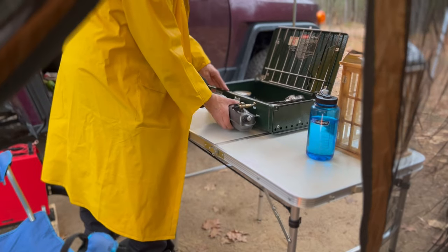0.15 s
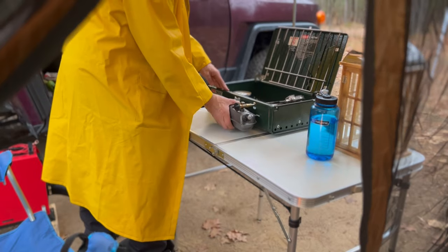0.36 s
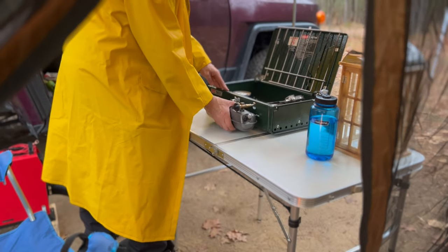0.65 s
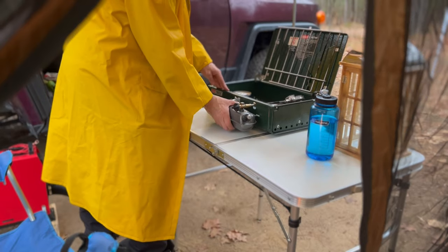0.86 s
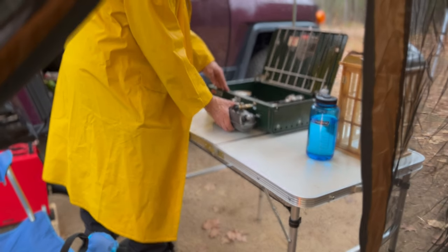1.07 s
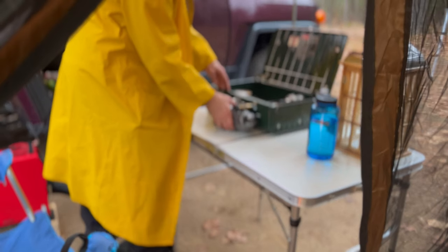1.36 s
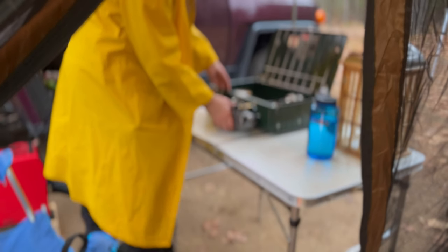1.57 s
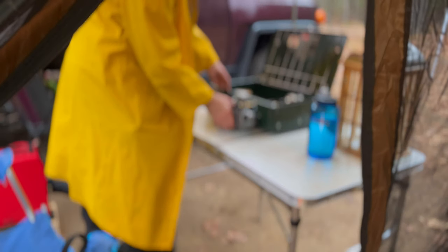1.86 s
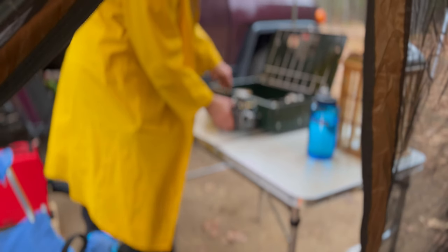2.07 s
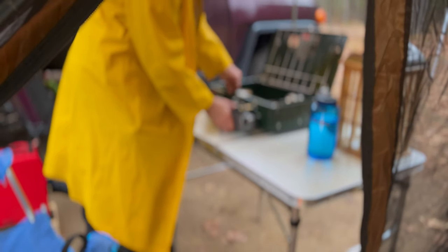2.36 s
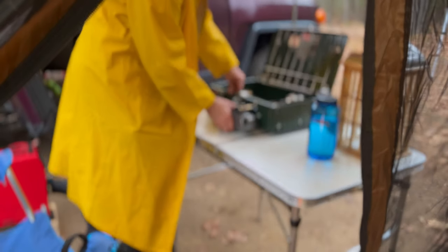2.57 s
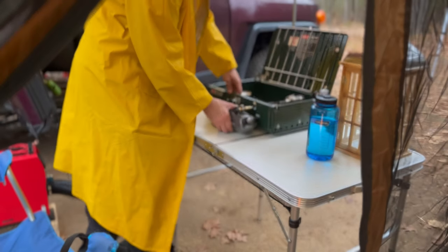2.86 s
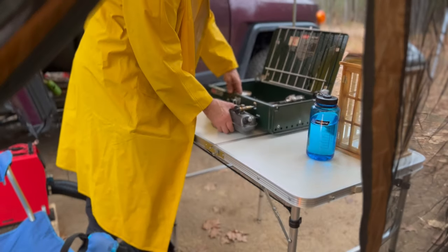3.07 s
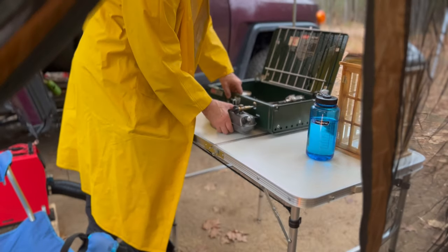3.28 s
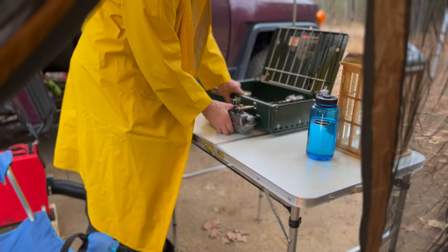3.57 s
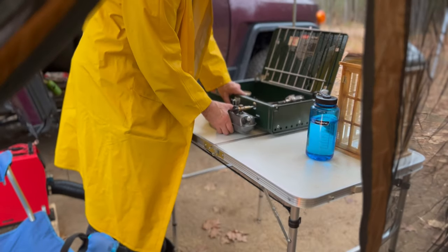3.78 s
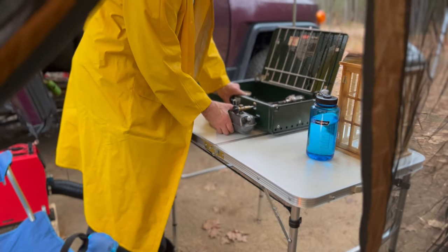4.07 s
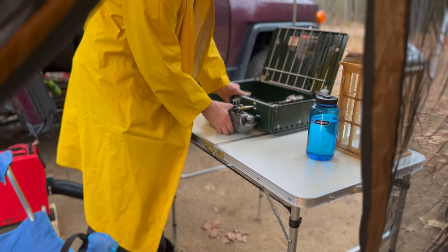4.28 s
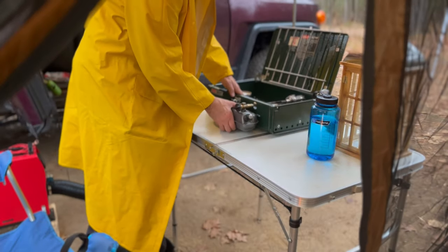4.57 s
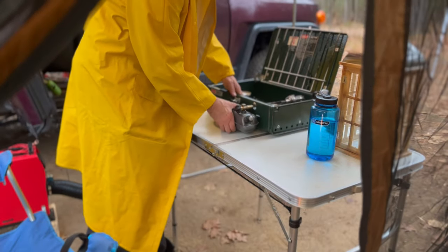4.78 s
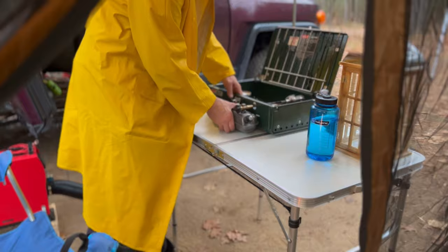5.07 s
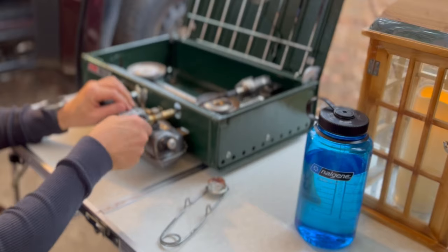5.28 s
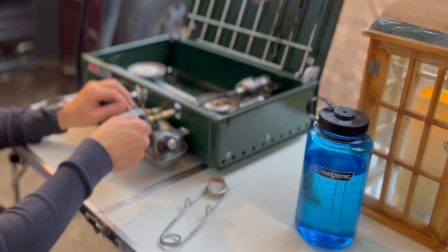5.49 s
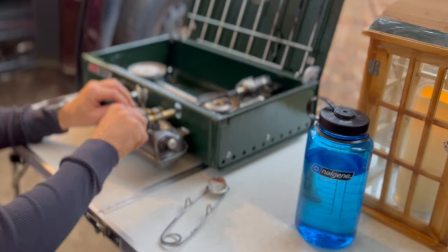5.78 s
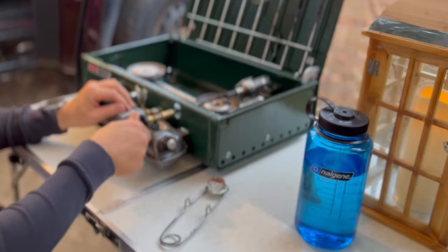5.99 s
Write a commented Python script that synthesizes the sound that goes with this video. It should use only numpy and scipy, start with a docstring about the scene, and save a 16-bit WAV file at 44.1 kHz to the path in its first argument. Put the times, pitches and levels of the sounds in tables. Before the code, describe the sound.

A sheet-metal camp stove is knocked and rattled on a folding table, then a small pump taps its hollow fuel tank in short series outdoors.

```python
"""Knocks and rattles of a sheet-metal camp stove on a folding table open the scene, amid faint fumbling.
Then a hand pump taps the hollow fuel tank in short series; the case is knocked and dragged in between.
Struck metal is sums of dying sines, rattle is sparse random contacts, shudder and hum are shaped noise.
Soft hiss and rumble of the open air and faint whistles lie behind, spread over two channels.
At 5.274 s all stove ringing stops at once; later stove sounds have less bass and the rumble is lower."""
import sys
import numpy as np
from scipy import signal
from scipy.fft import rfft, irfft, next_fast_len
from scipy.io import wavfile
from scipy.ndimage import uniform_filter1d

SR = 44100
rng = np.random.default_rng(int(sys.argv[2]) if len(sys.argv) > 2 else 0)


def unload_audio(sound):
    """Save the sound as a 16-bit wav file, at the path given as the first command line argument."""
    columns = np.transpose(np.atleast_2d(sound))
    # keep every value between -1 and 1, then stretch to whole-number steps
    steps = np.round(np.clip(columns, -1, 1) * 32767)
    wavfile.write(sys.argv[1], SR, steps.astype(np.int16))


N = 270333


def amp(db):
    """Decibels to gain."""
    return 10 ** (np.asarray(db) / 20)


def decay(t, t60_s):
    """Exponential fall by 60 dB in t60_s."""
    return amp(-60 * t / t60_s)


def evened(x):
    """Scales to rms 1."""
    return x / np.sqrt(np.mean(x ** 2) + 1e-20)


def loudest(x):
    """Scales so that the loudest five milliseconds have rms 1."""
    return x / np.sqrt(uniform_filter1d(x ** 2, size=220).max() + 1e-20)


def read(points, hz, axis=1):
    """Reads a spectrum table on a log-frequency axis."""
    table = np.array(points)
    return np.interp(np.log(hz + 1), np.log(table[:, 0] + 1), table[:, axis])


def coloured(x, points):
    """Shapes a signal by a (Hz, dB) table."""
    gain = amp(read(points, np.fft.rfftfreq(len(x), 1 / SR)))
    return irfft(rfft(x) * gain, len(x))


def add(mix, start_s, sound):
    """Mixes a sound in at start_s."""
    part = mix[round(start_s * SR):][:len(sound)]
    part += sound[:len(part)]


def ring(hz, db, t60_s, t, together=False):
    """Sums dying sines: random signs, or all starting together when struck at one spot."""
    sign = np.ones(len(hz)) if together else rng.choice([-1., 1.], len(hz))
    sines = np.sin(2 * np.pi * hz[:, None] * t)
    return (sign * amp(db)) @ (decay(t, t60_s[:, None]) * sines)


def grit(count, per_s, spread_db):
    """Sparse contacts at random moments, of random sign, a few of them large."""
    size = amp(spread_db * np.minimum(rng.exponential(1, count), 4))
    hit = rng.random(count) < per_s / SR
    return size * rng.standard_normal(count) * hit


# Pump strokes on the tank. Each row: start in seconds, blow level in dB, clatter re blow in dB,
# offsets in dB of the upper modes, lowest mode and bell mode, factor on the tank's t60.
TAPS = [(.843, -46.5, -5.5, -14, -13.5, -4, 1.04), (1.318, -45, -4.5, -12.5, -19.5, -13.5, 0.7),
        (1.526, -42, -7, -8, -19, -16.5, 0.71), (2.929, -48, -6, -21.5, -20, -20.5, 1.2),
        (3.145, -41.5, -6, -5, -17.5, -12, 0.92), (3.378, -44.5, -8, -6, -15.5, -14, 1.1),
        (3.5995, -44.5, -7, -17, -22, -14, 1), (3.796, -40.5, -7, -7, -16.5, -10, 0.73),
        (4.003, -38.5, -6, -8, -15, -11, 0.82), (5.285, -40.5, -8, -7.5, -31, 0.5, 1.07),
        (5.519, -53, -14, -10.5, -29, 0, 1.2), (5.766, -49, -2.5, -12.5, -26.5, -3, 1.42),
        (5.977, -43.5, -9, -7, -20, -3, 0.92)]
# Tank modes. Each row: frequency in Hz, level in dB, free t60 in seconds.
TANK = [(588.5, 11.5, 0.36), (802, -7.5, 0.36), (925, -6, 0.31), (960, -7.5, 0.21), (1038.5, 1.5, 0.34),
        (1058, -6, 0.28), (1084, 1, 0.21), (1482, 3, 0.145), (1435, -13, 0.114), (1560, 0.5, 0.16),
        (2176, -2, 0.173)]
BELL_HZ = 1570  # the mode near this takes its own offset
FIRST_BLOW, FIRST_BLOW_S = 1.2, 0.0045  # extra strength while the plunger presses, its time constant


def tap(blow_db, clatter_db, upper_db, lowest_db, bell_db, t60_factor):
    """The plunger strikes the tank: its hand-damped modes ring, with a short clatter on top."""
    t = np.arange(SR // 2) / SR
    hz, db, t60_s = np.transpose(TANK)
    is_bell = abs(hz / BELL_HZ - 1) < .04
    db = db + np.where(is_bell, bell_db, (hz > 1300) * upper_db)
    db = db + (hz < 700) * lowest_db + 0.81 * rng.standard_normal(len(hz))
    tone = ring(hz, db, t60_factor * t60_s, t, together=True) * (1 - np.exp(-t / 0.0032))
    tone = loudest(tone * (1 + FIRST_BLOW * np.exp(-t / FIRST_BLOW_S)))
    clatter = grit(len(t), per_s=6900, spread_db=2.5)
    clatter = clatter * decay(t, 0.22) * (1 - np.exp(-t / 0.0015))
    clatter_shape = [(300, -18), (650, -0.5), (1200, 0.5), (2500, -5.5), (6000, -13.0), (15000, -26.5)]
    clatter = loudest(coloured(clatter, clatter_shape))
    return amp(blow_db) * (tone + amp(clatter_db) * clatter)


# Knocks on the case. Each row: start in seconds, nominal thud, body, clank, tick and ring levels in dB,
# thud Hz, clank Hz, favoured mode Hz, nominal rattle t60 in seconds (both trimmed per band below).
KNOCKS = [(.016, -65, -49, -74.5, -74, -52, 153, 2900, 725, 0.38),
          (.108, -60, -42.5, -42.5, -55, -49, 202, 2725, 4700, 0.36),
          (.149, -68, -46, -50, -61.5, -48.5, 423, 2980, 2274, 0.32),
          (.233, -66, -45.5, -79.5, -78, -44, 278, 2900, 880, 0.55),
          (.244, -46, -72.5, -74, -72, -51, 164, 2600, 980, 0.11),
          (.667, -38, -34, -42, -47, -36, 302, 3460, 310, 0.287),
          (1.067, -51.5, -42, -43, -50, -48, 236, 2900, 2030, 0.27),
          (1.081, -49, -33.5, -40, -46, -38.5, 413, 1900, 528, 0.31),
          (1.092, -60, -37.5, -36, -42, -37.5, 315, 2800, 1940, 0.31),
          (1.117, -48.5, -43.5, -64, -49.5, -39, 423, 3200, 1460, 0.51),
          (1.717, -58, -46, -53, -54, -45, 374.5, 3170, 445, 0.27),
          (1.827, -54.5, -52.5, -53, -52, -56, 310.1, 2820, 880, 0.41),
          (2.015, -62, -71, -59, -59, -59, 297.4, 2800, 923, 0.345),
          (2.95, -51, -53, -48, -55, -53, 296.5, 2580, 1070, 0.096),
          (2.985, -53.5, -45.5, -56, -61, -51, 225.4, 2620, 1987, 0.49),
          (3.363, -41, -46, -63, -67, -49, 190.2, 2200, 500, 0.15),
          (3.437, -50, -48, -77, -73.5, -52, 126, 1900, 560, 0.27),
          (3.647, -56, -51.5, -55, -75, -58.5, 299, 1700, 1100, 0.14),
          (3.854, -59, -50, -65, -77, -51, 281, 3700, 1070, 0.206),
          (4.409, -74, -35.5, -37.5, -38.5, -41.5, 318, 2220, 757, 0.42),
          (4.42, -64.5, -32, -33, -59, -33, 315, 3170, 976, 0.47),
          (4.443, -61.5, -35, -35, -57, -40.5, 163, 2200, 740, 0.3),
          (4.469, -39, -39, -40, -45, -54, 228, 2350, 644, 0.31),
          (4.566, -54, -41, -45, -48, -38, 196, 2700, 548, 0.335),
          (4.584, -41.5, -33.5, -45, -49.5, -40, 268, 2000, 677, 0.137),
          (4.594, -58, -30.5, -36, -39.5, -43, 208, 2600, 2630, 0.23),
          (4.605, -49, -45, -37.5, -46.5, -35.5, 320, 2000, 477, 0.28),
          (4.696, -59, -43.5, -46, -50.5, -49, 120, 2970, 1075, 0.54),
          (4.731, -44, -50, -55.5, -61, -47.5, 122.4, 2380, 474, 0.18),
          (4.831, -63, -50.5, -59, -51.5, -66.5, 155.5, 3300, 1608, 0.14),
          (4.904, -47.5, -48, -58, -59.5, -69, 122.5, 2500, 1600, 0.16),
          (4.984, -47, -52, -64, -57.5, -69, 120, 3300, 1580, 0.11),
          (5.187, -52.5, -49.5, -66.5, -62, -57, 230, 2720, 832, 0.247),
          (5.611, -43.5, -54.5, -55, -62, -42.5, 299, 2440, 436.4, 0.25),
          (5.726, -55.5, -61, -57, -69, -66.5, 183.8, 2860, 413, 0.79),
          (5.854, -58, -50, -57, -57, -54.5, 378.7, 2690, 818, 0.18),
          (5.899, -50.5, -59, -71.5, -85, -67, 148, 2780, 387, 0.12)]
# Case and table modes, also used by scrape. Each row: frequency in Hz, level in dB,
# undamped t60 in seconds.
CASE = [(105.4, 6, 0.86), (188, 4, 0.55), (216.5, 12.5, 0.26), (315, 3, 0.94), (381, -8, 0.29),
        (444, -23.5, 0.16), (481, 7.5, 0.33), (542, 5.5, 0.37), (594.6, 3.5, 0.35), (611, 12.5, 0.21),
        (742.5, -3.5, 0.51), (880, 0, 0.11), (961, -2, 0.37), (1042, 9.5, 0.123), (1476, 3, 0.28),
        (1987, 5.5, 0.3), (2272, 4, 0.15), (2630, -24, 0.2), (3170, 5.5, 0.11), (3230, 13, 0.078),
        (3540, 3.5, 0.3), (4090, 11, 0.049), (4700, 12, 0.04), (6370, 10.5, 0.078)]
BODY_HZ, TICK_HZ = 804, 5400  # band centres
CLANK_SHARE = 0.67  # clank t60 re rattle t60


def knock(thud_db, body_db, clank_db, tick_db, ring_db, thud_hz, clank_hz, favoured_hz, rattle_t60_s):
    """A blow and its loose rattle shake the case; the spot struck favours one mode."""
    t = np.arange(SR // 2) / SR
    modes_hz, modes_db, modes_t60_s = np.transpose(CASE)
    contacts = grit(len(t), per_s=8000, spread_db=2.0)

    varied_db = modes_db + 0.98 * rng.standard_normal(len(CASE))
    panel = ring(modes_hz, varied_db, 0.23 * modes_t60_s, t[:8000])
    shaken = signal.fftconvolve(contacts, panel)[:len(t)]
    shaken = coloured(shaken, [(100, 0.52), (6400, 15.0)])
    spectrum = rfft(evened(contacts) + amp(-9.0) * evened(shaken))
    f = np.fft.rfftfreq(len(t), 1 / SR)

    clank_t60_s = CLANK_SHARE * rattle_t60_s
    # Each row: level in dB, centre in Hz, spread in log frequency, rise in s, t60 in s.
    bands = ((thud_db - 0.5, thud_hz, .4, .005, 1.16 * rattle_t60_s),
             (body_db, BODY_HZ, .62, .003, rattle_t60_s),
             (clank_db, clank_hz, .23, .0012, clank_t60_s),
             (tick_db, TICK_HZ, .4, .001, 1.7 * clank_t60_s),
             (tick_db - 4.5, 2 * TICK_HZ, .35, .0009, 0.8 * clank_t60_s))
    out = np.zeros(len(t))
    for db, centre_hz, spread, rise_s, t60_s in bands:
        share = np.exp(-.5 * (np.log((f + 1) / centre_hz) / spread) ** 2)
        fade = decay(t, np.clip(t60_s, .02, 1)) * (1 - np.exp(-t / rise_s))
        fade *= 1 + 1.16 * np.exp(-t / (1.13 * rise_s))  # the first contact is the hardest
        out += amp(db) * loudest(irfft(spectrum * share, len(t)) * fade)

    # the panel's first bow
    bow = np.sin(2 * np.pi * thud_hz * t) * decay(t, np.clip(rattle_t60_s, .02, 1))
    out += amp(thud_db + 1.5) * bow * (1 - np.exp(-t / 0.00104))

    near_db = -700 * np.log(modes_hz / favoured_hz) ** 2  # only modes close to the favoured one ring on
    struck = contacts * decay(t, 0.12)  # later contacts keep upsetting the ring
    struck[0] = 3 * np.abs(struck).max()
    ring_t60_s = np.minimum(0.43 * modes_t60_s, 0.89 * rattle_t60_s)
    tone = signal.fftconvolve(struck, ring(modes_hz, near_db, ring_t60_s, t))[:len(t)]
    return out + amp(ring_db) * loudest(tone)


# Hard single contacts on one spot of sheet metal or table top.
# Each row: start in seconds, peak in dB, frequency in Hz, t60 in seconds.
CLINKS = [(.109, -36.5, 3000, 0.0305), (.109, -48, 4913, 0.11), (.12, -40.5, 2040, .04),
          (.146, -44, 2240, .08), (.154, -41.5, 3010, 0.061), (.237, -41, 900, .1), (.662, -40, 2300, .03),
          (.6663, -28.5, 4350, 0.013), (.6663, -31, 3650, 0.016), (.669, -39, 1345, 0.054),
          (.717, -39, 784, 0.067), (1.082, -33.5, 531.4, 0.113), (1.082, -32, 1400, .08),
          (1.094, -26.5, 3150, 0.054), (1.0935, -35, 3600, 0.05), (1.098, -31, 1440, 0.0515),
          (1.101, -34, 1969, 0.05), (1.118, -29.5, 1470, 0.17), (1.118, -35, 3170, 0.087),
          (1.126, -44.5, 12000, 0.11), (1.718, -37.5, 448, 0.092), (1.74, -41.5, 1140, 0.062),
          (1.822, -41, 316, 0.075), (1.853, -42, 299, 0.19), (2.955, -37, 1086, 0.049),
          (2.957, -44, 280, 0.071), (2.986, -43, 297.5, 0.059), (3.012, -43.5, 599, 0.34),
          (3.003, -45, 171, 0.097), (3.017, -38.5, 169, 0.14), (3.367, -32.5, 190, 0.05),
          (3.437, -39, 1010, 0.045), (3.45, -45, 554, 0.06), (4.41, -33, 923, .15),
          (4.449, -34, 12260, .04), (4.587, -30, 637, 0.052), (4.595, -23, 4060, 0.018),
          (4.595, -35, 6320, .04), (4.595, -28, 2477, 0.087), (4.598, -26, 2590, 0.043),
          (4.594, -25.5, 1404, 0.06), (4.608, -29, 473, .045), (4.697, -39, 1320, 0.051),
          (4.731, -36.5, 333, 0.093), (4.744, -37, 129.6, 0.17), (5.158, -46, 99.8, 0.22),
          (5.187, -43, 800, 0.063), (5.194, -39, 222, 0.076), (5.212, -39, 302, 0.035),
          (5.248, -41, 201, 0.093)]


def clink(peak_db, hz, t60_s):
    """One mode struck hard and then nudged by chatter, so it rings rough and dies fast."""
    t = np.arange(SR // 4) / SR
    chatter = grit(900, per_s=900, spread_db=1.0) * np.exp(-t[:900] / 0.0064)
    chatter[0] = 3
    mode = decay(t, np.clip(t60_s, .01, 1)) * np.sin(2 * np.pi * hz * t)
    tone = signal.fftconvolve(chatter, mode)
    return amp(peak_db) * tone / np.abs(tone).max()


# Single dry ticks of small parts. Each row: start in seconds, level in dB, centre in Hz.
TICKS = [(2.186, -39.5, 1560), (3.3315, -37, 2120), (3.647, -35, 1200), (4.04, -30.5, 1124),
         (4.245, -42, 1106), (4.28, -38.5, 1515), (4.445, -22, 1900), (4.598, -23, 2600),
         (5.397, -31.5, 3570), (5.504, -43, 1900)]


def tick(db, hz):
    """A sine of a cycle or two, gone at once."""
    t = np.arange(300) / SR
    return amp(db) * np.sin(2 * np.pi * hz * t) * np.exp(-t * hz / 1.85)


# Wire grate bouncing on its rests. Each row: start in seconds, level in dB.
BOUNCES = [(1.417, -55), (1.4774, -52), (1.6457, -53), (1.8, -52.5), (4.75, -42.5), (4.8367, -46),
           (4.9137, -49), (4.985, -49.5)]
GRATE_HZ, GRATE_T60_S = 1572, 0.29


def bounce(db):
    """One grate mode rings for 43 ms, its ends smoothed."""
    t = np.arange(1900) / SR
    tone = decay(t, GRATE_T60_S) * np.sin(2 * np.pi * GRATE_HZ * t)
    return amp(db) * tone * signal.windows.tukey(len(t), .3)


# The case dragged over the table. Each row: start in seconds, length in seconds,
# peak push in dB, bright part re dull part in dB.
SCRAPES = [(1.72, 0.072, -45.5, -24), (1.805, 0.392, -53, -13), (2.245, 0.047, -58, -18),
           (2.945, 0.16, -46, -21.5), (4.408, 0.16, -35.5, -3), (4.66, 0.056, -43, -6.5),
           (4.72, 0.062, -43.5, -16), (4.79, 0.23, -53, -9), (5.215, 0.052, -50, -9)]
GRIP, SLACK_DB = 0.287, -11  # push peaks at this share of the drag; level at both ends re peak


def scrape(length_s, push_db, bright_db):
    """Quick slips of the feet shake the panels while the case slides."""
    t = np.arange(0, length_s, 1 / SR)
    hz, db, t60_s = np.transpose(CASE)
    slips = grit(len(t), per_s=6000, spread_db=3.0)
    panel = ring(hz, db, 0.13 * t60_s, np.arange(4000) / SR)
    shaken = evened(slips) + 0.27 * evened(signal.fftconvolve(slips, panel)[:len(t)])
    dull_shape = [(60, -56.5), (120, 6.0), (300, 8.0), (1500, 1.0), (3000, -8.0), (6000, -32)]
    bright_shape = [(1200, -37), (2600, -8.0), (5000, -11.0), (9000, -15), (15000, -22)]
    dull = evened(coloured(shaken, dull_shape))
    bright = evened(coloured(shaken, bright_shape))
    push = amp(push_db + np.interp(t / length_s, [0, GRIP, 1], [SLACK_DB, 0, SLACK_DB]))
    return push * (dull + amp(bright_db) * bright) * signal.windows.tukey(len(t), .1)


def swell(shape, db, rise_s, t60_s):
    """Noise through broad modes that builds up after a jolt and dies away."""
    t = np.arange(SR) / SR
    fade = loudest((1 - np.exp(-t / rise_s)) * decay(t, t60_s))
    return fade * amp(db) * evened(coloured(rng.standard_normal(SR), shape))


# Jolts of the table top. Each row: start in seconds, level in dB, t60 in seconds.
JOLTS = [(0, -50.5, 0.5), (.235, -51.5, 1.26), (.47, -61, 0.85), (.668, -45, 0.97), (1.083, -48, 1.6),
         (1.38, -54, 0.76), (1.625, -53.5, .3), (1.73, -51, 1.8), (2.76, -58.5, 0.74), (2.98, -47.5, 0.86),
         (3.36, -53, 0.56), (3.44, -47, 0.488), (3.638, -56.5, 1.1), (3.853, -65, 0.72), (4.44, -41, 1.16),
         (4.59, -43, 0.58), (4.725, -46, 0.56), (4.912, -54.5, 0.88), (5.155, -61, 0.56), (5.612, -49, 0.8)]
# Table-top resonance. Each row: frequency in Hz, relative level in dB per Hz.
TABLE_TOP = [(40, -3), (70, -3.5), (108, 9.5), (135, 1), (180, 5), (230, -1), (300, -2.5), (420, -42)]


def shudder(db, t60_s):
    """Low random shudder of the table top."""
    return swell(TABLE_TOP, db, rise_s=0.0056, t60_s=t60_s)


# Hollow parts humming as hands shake the case.
# Each row: start in seconds, level in dB, pitch as a ratio to HUM_SHAPE.
HUMS = [(.51, -54.5, 0.755), (5.612, -44, 0.99), (5.775, -53, 0.99), (5.9, -59.5, 0.98), (6.045, -57, 1.)]
# Hum resonance at pitch 1. Each row: frequency in Hz, relative level in dB per Hz.
HUM_SHAPE = [(300, -39), (375, -8), (393, -1), (415, 1.5), (520, -56)]


def hum(db, pitch):
    """Noise in one narrow resonance."""
    return swell(np.array(HUM_SHAPE) * [pitch, 1], db, rise_s=0.0034, t60_s=0.47)


FUMBLE_PER_S, FUMBLE_DB = 120, -52  # mean tick rate; tick level before random sizes


def fumbling():
    """Fingers on metal: tiny ticks at random moments, each at one of six pitches."""
    contacts = grit(N, FUMBLE_PER_S, spread_db=1.5)
    kind = rng.integers(0, 6, N)
    out = np.zeros(N)
    for k, hz in enumerate(np.geomspace(900, 3500, num=6)):
        out += signal.oaconvolve(contacts * (kind == k), tick(FUMBLE_DB, hz))[:N]
    return out


# Faint thin whistles, perhaps a bird. Each row: start in seconds, length in seconds, Hz, level in dB.
WHISTLES = [(.84, 0.138, 5480, -64), (2.378, 0.112, 5430, -63.5), (3.594, 0.162, 5400, -62.5)]


def whistle(length_s, hz, db):
    """A soft sine that wavers a little."""
    t = np.arange(round(length_s * SR)) / SR
    waver = 2.15 * np.sin(2 * np.pi * 23 * t)
    return amp(db) * np.sin(2 * np.pi * hz * t + waver) * signal.windows.tukey(len(t), .6)


# Rumble level over time. Each row: time in seconds, relative level in dB.
AIR = [(0.0, -58.5), (.5, -58), (2.3, -56.5), (2.9, -60.5), (3.6, -56), (3.98, -58), (4.2, -64.5),
       (4.4, -59.5), (4.8, -52), (5.1, -60), (5.265, -58), (5.28, -77), (5.6, -80.5), (5.66, -69.5),
       (6.13, -64.5)]
# Rumble spectrum. Each row: frequency in Hz, relative level in dB per Hz.
RUMBLE = [(25, -63), (50, 17.5), (100, -1), (200, -8.5), (400, -4), (750, -5), (1100, -31.5)]
# Hiss spectrum. Each row: frequency in Hz, relative level in dB per Hz.
HISS = [(200, -8), (500, -6), (1200, 3.5), (2000, 0), (3500, -4), (5000, -6), (6500, -12), (9000, -16.5),
        (12500, -17.5), (15500, -35)]
HISS_DB = -54  # steady, same relative scale as AIR


def air():
    """Open air: two unrelated noise draws sharing one patchy spectrum of rumble and hiss."""
    frames, hz = N // 256 + 5, np.fft.rfftfreq(1024, 1 / SR)
    t = np.arange(frames) * 256 / SR
    patches = rng.standard_normal((frames, 513)).T
    patches = uniform_filter1d(patches, size=10, axis=0)
    patches = evened(uniform_filter1d(patches, size=10, axis=1))
    rumble_db = np.interp(t, *np.transpose(AIR))
    power = 0
    for shape, level_db in ((RUMBLE, rumble_db), (HISS, HISS_DB + 0 * t)):
        gain = amp(read(shape, hz))
        power = power + np.outer(gain / np.linalg.norm(gain), amp(level_db)) ** 2
    real, imag = np.transpose(rng.standard_normal((frames, 513, 2, 2)))
    spectra = (real + 1j * imag) * np.sqrt(power) * amp(2.0 * patches + 1.0)
    return signal.istft(spectra, nperseg=1024, noverlap=768)[1][:, :N]


def scattered(x, t60_s):
    """Sparse reflections from nearby surfaces, energy 1, drawn anew for every sound."""
    at = np.arange(20, 6000, 20) + rng.integers(0, 20, 299)
    echoes = np.zeros(6100)
    echoes[at] = rng.choice([-1., 1.], len(at)) * decay(at / SR, t60_s)
    return signal.fftconvolve(x, echoes / np.linalg.norm(echoes))


# Phase between the channels. Each row: frequency in Hz, left lead in radians.
CHANNEL_PHASE = [(0, 0), (1380, -0.2), (2670, 0.7), (3620, 0.5), (4740, 0.5), (5600, -1.2), (6460, -1.0),
                 (7670, -2.9), (8870, -3.2), (11100, -6.2), (13000, -6.4), (13600, -6.8), (14000, -9.2),
                 (15200, -9.5)]
# Likeness of the left and right channels, by frequency.
# Each row: frequency in Hz, likeness for near sounds, likeness for the air.
LIKENESS = [(100, .995, .985), (300, .985, .92), (700, .88, .35), (1400, .8, .15), (2400, .9, .55),
            (3800, .8, .42), (5200, .5, .15), (7000, .75, .55), (8500, .97, .97), (10300, .75, .6),
            (12000, .97, .97), (14000, .65, .5)]
# Balance between the channels. Each row: frequency in Hz, left re right in dB.
LEAN = [(400, 0.3), (900, -1.1), (2000, 0.6), (4400, 1.8), (8000, 0)]


def stereo(shared, other, axis):
    """Shared and opposed parts set the likeness; the channels differ in phase and balance by frequency."""
    size = next_fast_len(N)
    hz = np.fft.rfftfreq(size, 1 / SR)
    like = np.clip(read(LIKENESS, hz, axis=axis), 0, 1)
    same = rfft(shared, size) * np.sqrt((1 + like) / 2)
    apart = rfft(other, size) * np.sqrt((1 - like) / 2)
    # half of the phase and balance on each channel
    turn = np.exp(.5j * np.interp(hz, *np.transpose(CHANNEL_PHASE))) * amp(read(LEAN, hz) / 2)
    return irfft(np.array([(same + apart) * turn, (same - apart) / turn]), size)[:, :N]


CUT_S = 5.274  # earlier stove sounds stop here; later ones have thinner bass
# Bass of the later sounds. Each row: frequency in Hz, gain in dB.
THIN_BASS = [(60, -10), (110, -3.5), (170, 0)]


def scene():
    """Stove sounds close by with their reflections, air and whistles around."""
    near, other, far = fumbling(), np.zeros(N), air()
    layers = ((JOLTS, shudder), (HUMS, hum), (SCRAPES, scrape), (KNOCKS, knock),
              (TAPS, tap), (TICKS, tick), (CLINKS, clink), (BOUNCES, bounce))
    for table, source in layers:
        for start_s, *row in table:
            sound, keep = source(*row), N
            if start_s < CUT_S:
                keep = round((CUT_S - start_s) * SR)
            else:
                sound = coloured(sound, THIN_BASS)
            add(near, start_s, sound[:keep])
            add(near, start_s, amp(-10.0) * scattered(sound, 0.15)[:keep])
            add(other, start_s, scattered(sound, 0.077)[:keep])
    for start_s, *row in WHISTLES:
        add(far[0], start_s, whistle(*row))
    lead = round(0.000997 * SR)  # contacts begin a moment before they peak
    close = stereo(np.roll(near, -lead), np.roll(other, -lead), axis=1)
    return close + stereo(*far, axis=2)


EDGE_HZ = 15700


def record(dry):
    """The low cut of the microphones, then a steep treble limit."""
    low_cut = signal.butter(4, 48., "highpass", fs=SR, output="sos")
    treble_limit = signal.firwin(511, EDGE_HZ, window=("kaiser", 9), fs=SR)
    return signal.oaconvolve(signal.sosfilt(low_cut, dry), treble_limit[None], "same")


dry = scene()
out = record(dry)
unload_audio(out)
```